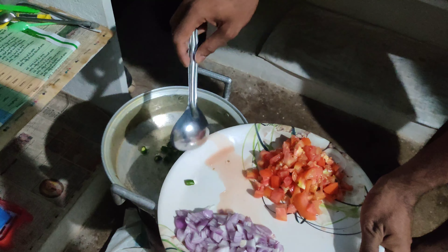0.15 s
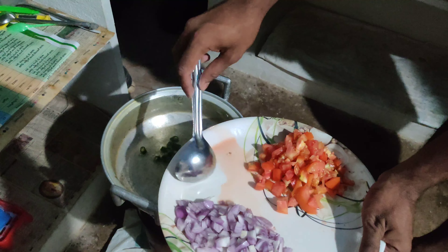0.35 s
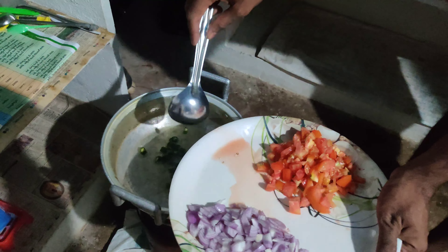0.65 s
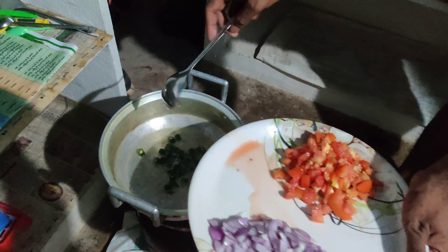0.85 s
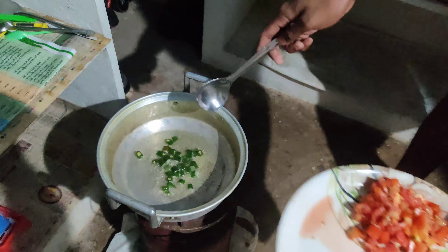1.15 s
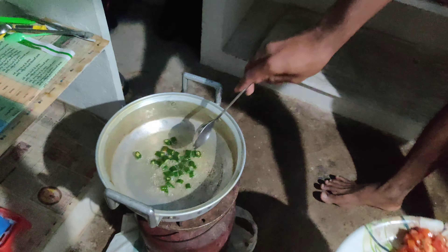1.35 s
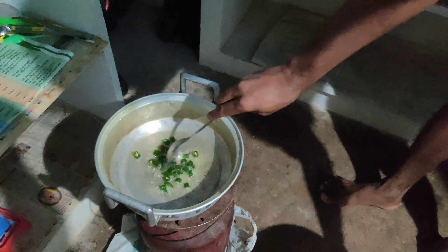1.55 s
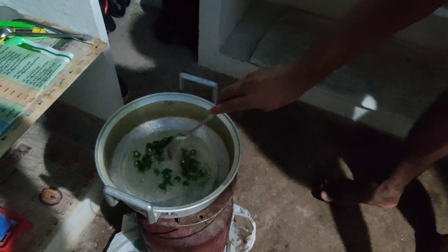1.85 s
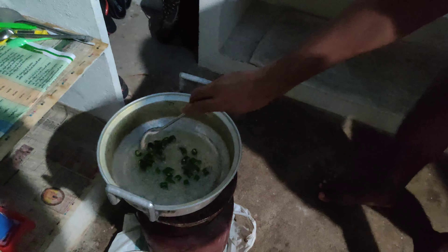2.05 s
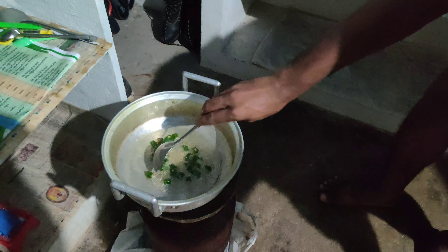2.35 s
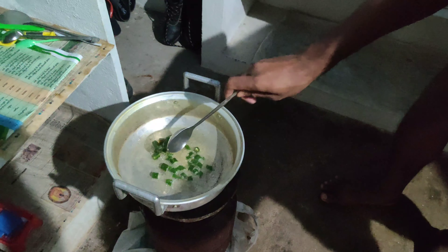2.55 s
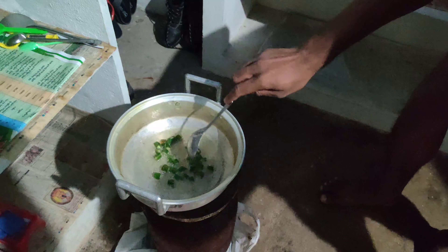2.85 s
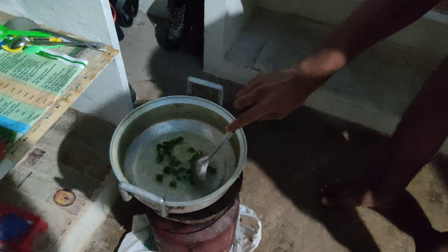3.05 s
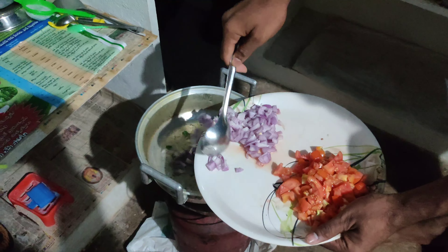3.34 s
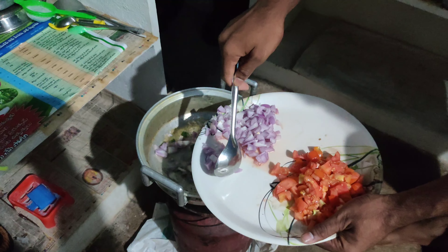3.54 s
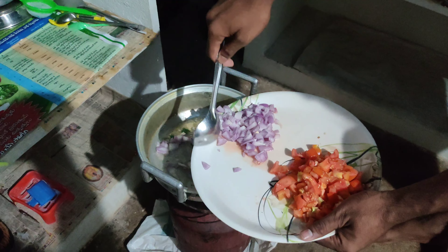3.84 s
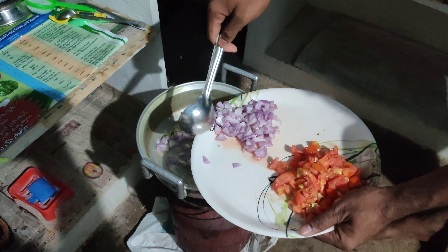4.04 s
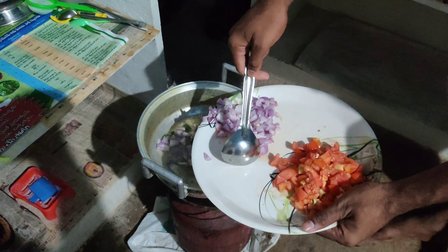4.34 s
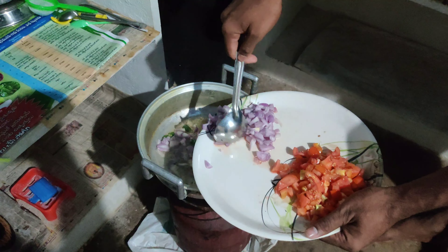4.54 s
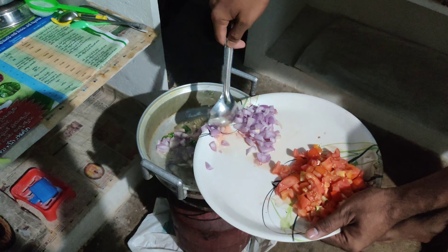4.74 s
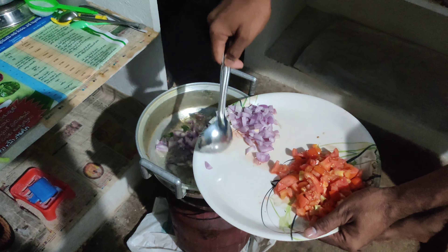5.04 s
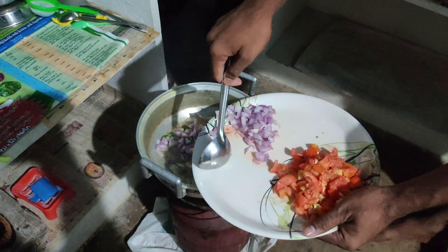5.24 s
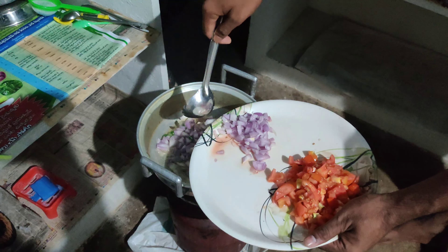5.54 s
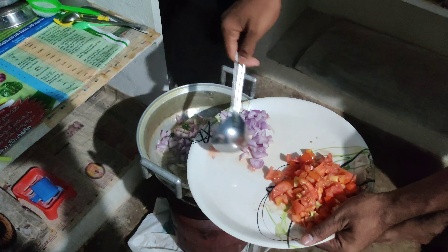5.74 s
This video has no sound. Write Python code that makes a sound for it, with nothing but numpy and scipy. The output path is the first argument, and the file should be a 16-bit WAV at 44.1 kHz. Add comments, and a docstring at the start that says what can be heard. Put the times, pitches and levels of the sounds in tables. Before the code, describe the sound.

Close stereo sound in a small home kitchen. From 0 to 3.2 s, chopped chillies fry in a metal pot: a dense, steady, grainy sizzle, strongest in the upper mids, with hollow pot resonance and brief dips. Small oily spits pop around 0.2-0.3, 1.2-1.6, 2.3-2.7 and 3.0 s. A steel spoon drags faintly, taps lightly near 0.45 s, clanks with a hollow ring at 1.83 s, rattles in a quick cluster at 2.7 s and knocks at 3.15 s with a scrape. At 3.2 s everything cuts out for under a tenth of a second, then fades in by 3.5 s as onion frying: quieter, finer, higher, flaring as pieces land and gradually drying down. Soft low plate bumps come near 3.45 and 4.4 s; spoon knocks at 3.7, 4.42 (clearest), 5.03, 5.26 and faintly 5.78 s. Low fluttering stove rumble and faint hum continue underneath, until the end at about 5.9 s.

```python
"""In a kitchen, close over a metal pot on a stove: green chillies fry in hot oil, stirred with a steel spoon.
Thousands of noisy bubble bursts, coloured by bubble size and the air in the pot, make the sizzle at two microphones.
Short swarms of noise splutter; damped sines make the spoon's knocks; its drags are noise through narrow resonances.
The sound drops out briefly and fades back in on chopped onion pushed off a plate: a finer, higher sizzle.
A low rumble and faint hum lie underneath; soft low bumps come from the plate."""
import sys
import numpy as np
from scipy import signal
from scipy.fft import rfft, irfft
from scipy.io import wavfile
from scipy.ndimage import uniform_filter1d

SR = 44100
rng = np.random.default_rng(int(sys.argv[2]) if len(sys.argv) > 2 else 0)


def to_wav(s):
    """Save 16-bit WAV."""
    ch = np.atleast_2d(s).T  # columns
    pcm = np.round(np.clip(ch, -1, 1) * 32767)  # PCM
    wavfile.write(sys.argv[1], SR, pcm.astype(np.int16))


N = 259749
TIME = np.arange(N) / SR

# All table levels are relative; the functions set the final balance.
# Chilli sizzle at the two microphones: pitch_hz, left_db, right_db
SIZZLE_SPECTRUM = [(385, -29.5, -29), (995, -15, -14), (1760, -11.5, -9.5), (2160, -5, -3.5),
                   (3220, -3.5, 1.1), (4580, -3.5, -1), (5470, -16, -2.5), (7100, -13.5, -3),
                   (8710, -19.5, -20), (10000, -19, -19), (13100, -20, -17.5), (15800, -18.0, -20.5)]
# Change of colour with wet onion: pitch_hz, change_db
ONION_COLOUR = [(500, 11.5), (1000, -2), (2300, -0.5), (4000, 4.5), (6500, 7), (9500, -6), (14000, -2)]
# Resonances of the air in the pot: pitch_hz, width_hz, lift_db
POT_AIR = [(446, 84, 14.5), (615, 49, 14.5), (746, 39, 10), (1200, 105, 7)]
# Lulls as the food is lifted or pushed out of the oil: middle_s, half_length_s, depth_db, tiny_bubble_loss_db
LULLS = [(0.36, 0.071, 2, 3.5), (0.62, 0.047, 2, 1), (1.055, 0.16, 2, 0), (1.40, 0.064, 0.5, 2.5),
         (1.703, 0.032, 7.5, -0.5), (1.765, 0.032, 4.5, 4), (2.22, 0.061, 2.5, -0.5),
         (2.514, 0.059, 0.7, 2.5), (2.774, 0.043, 2.5, 3.5), (4.688, .04, 3.5, 0), (5.14, 0.059, 0.5, 2.5)]
# Rumble of the stove and kitchen: pitch_hz, level_db (per Hz)
RUMBLE_SPECTRUM = [(25, 2.5), (42, -7.5), (64, -7.5), (82, -13), (98, -5), (130, -13), (172, 0.5),
                   (205, -0.5), (252, -5.5), (292, -11.5), (343, -5.5), (400, -20), (600, -3.5),
                   (1500, -34)]
# Rise and fall of the rumble and hum: time_s, level_db
RUMBLE_SWELL = [(0, 3), (.8, 2.5), (1.7, -1), (2.2, -1.5), (3.2, 1), (4.4, 2.5), (5.3, 3), (5.89, 3)]
# Strokes of the spoon that make the metal sing: start_s, end_s, level_db
DRAGS = [(0.023, 0.39, -33.5), (0.45, 0.544, -32), (0.687, 1.214, -37), (1.46, 1.683, -38.5),
         (1.883, 2.13, -41), (2.98, 3.095, -37.5), (3.132, 3.2, -18.5), (3.343, 3.60, -37.5),
         (5.08, 5.15, -31), (5.18, 5.239, -29), (5.28, 5.355, -37)]
# What sings under the dragging spoon: pitch_hz, half_width_hz, level_db
SINGING_METAL = [(610, 16, 8), (634, 75, -2), (1200, 28, -2)]
# Oil spluttering as the food shifts: start_s, level_db, centre_hz, decay_s
SPLUTTERS = [(0.217, -17, 3700, 0.012), (.236, -10, 3760, 0.011), (0.297, -10.5, 2680, 0.0054),
             (.320, -16, 2380, .006), (1.232, -12, 3500, 0.019), (1.335, -13, 2730, 0.017),
             (1.630, -13, 2920, 0.026), (2.320, -14, 3800, 0.0088), (2.557, -15, 4100, 0.014),
             (2.654, -12, 3980, 0.0069), (2.963, -16, 2550, 0.028), (3.044, -10, 2700, 0.011),
             (4.3805, -13.5, 7500, .003), (4.765, -19, 4800, 0.015), (5.031, -17, 4200, 0.014),
             (5.503, -22, 3900, 0.02), (5.678, -20.5, 3750, 0.023)]
# Ringing of the pot: pitch_hz, level_db, t60_s
POT_MODES = [(317.4, 0.5, 0.46), (476, -21, 0.26), (574, -10, 0.32), (618.6, 2.5, 0.18), (640, 0, 0.21),
             (678, -13.5, 0.35), (744, -7.5, 0.25), (808, -8.5, 0.47), (930, -9, 0.084), (1067, -8, 0.34),
             (1190, -42.5, 0.26), (1200, -8, 0.19), (1380, -10, 0.25), (2070, -19, .2), (2350, -19.5, .2)]
# Knocks of the spoon: start_s, ring_db, struck_place_hz, thud_db, scrape_db
KNOCKS = [(0.432, -18, 510, -13.5, -14.5), (.442, -19, 600, -22, -17), (.510, -26, 700, -18, -17),
          (1.834, -5.5, 634, -6, -16), (1.864, -23, 600, -24, -17), (2.694, -12, 730, -6, -34),
          (2.702, -28, 890, -29, -13), (2.711, -12, 1200, -7.5, -18), (2.711, -22.5, 344, -21, -37),
          (2.721, -11.5, 780, -6.5, -26), (3.146, -10.5, 640, -8, -16), (3.176, -39, 610, -10, -30),
          (3.702, -22, 1200, -17.5, -24), (4.4165, -14, 747, -7.5, -26), (4.427, -23, 1050, -8, -24),
          (5.026, -22, 840, -20, -18), (5.033, -36, 1200, -34, -20), (5.259, -19, 790, -19, -23.5),
          (5.780, -37, 1200, -33, -23.5)]
# Pieces of onion land and the sizzle flares: start_s, lift_db, time_to_top_s
FLARES = [(3.66, 0.9, .05), (3.79, 1.2, 0.097), (4.07, 1.2, 0.055), (4.36, 1.0, 0.055), (4.49, 0.5, 0.041),
          (4.88, 1.6, 0.013), (5.02, 1, .02), (5.24, 2.5, 0.038), (5.59, 0.6, 0.059), (5.80, 1.3, 0.048)]
# Soft bumps as the plate is handled: start_s, level_db, pitch_hz
BUMPS = [(3.446, -25, 69.4), (3.506, -36, 111), (4.359, -29, 90.5), (4.421, -32, 97)]

PAUSE_START_S, PAUSE_END_S = 3.204, 3.291
ONION_FROM_S = (PAUSE_START_S + PAUSE_END_S) / 2
FADE_DB, FADE_S = 17, 0.11  # depth and length of the fade after the pause
EDGE_HZ = 15950  # upper band limit

# Chillies: large and tiny bubbles are relative to the main 2.5-8 kHz sizzle
CHILLI_DB, HEATING_DB_PER_S, CHILLI_LARGE_DB, CHILLI_TINY_DB = -20.5, 0.12, -9.5, -11.5
# Onion: builds up until ONION_FULL_S, then sinks as it dries
ONION_DB, ONION_FULL_S, BUILD_DB_PER_S, DRYING_DB_PER_S = -26, 3.562, 44, 2.5
# Its large bubbles hold up while it dries; its tiny ones sink and flare somewhat more than the main sizzle
ONION_LARGE_DB, ONION_TINY_DB, LARGE_SHARE, TINY_EXTRA_SHARE = -12.5, -4, 0.94, 0.35


def amp(db):
    """Decibels to gain."""
    return 10 ** (np.asarray(db) / 20)


def evened(x):
    """Scales to rms 1."""
    return x / np.sqrt(np.mean(x ** 2) + 1e-20)


def read(points, hz, axis=1):
    """One column of a spectrum table, on a log-frequency axis."""
    table = np.transpose(points)
    return np.interp(np.log(hz + 1), np.log(table[0] + 1), table[axis])


def hump(hz, centre_hz, octaves):
    """A bell on the log-frequency axis."""
    return np.exp(-.5 * (np.log2((hz + 1) / centre_hz) / octaves) ** 2)


def coloured(x, gain):
    """Filters by a gain that is a function of frequency."""
    hz = np.fft.rfftfreq(x.shape[-1], 1 / SR)
    return irfft(rfft(x) * gain(hz), x.shape[-1])


def add(mix, start_s, sound):
    """Adds a stereo sound at a given time."""
    part = mix[:, round(start_s * SR):][:, :sound.shape[1]]
    part += sound[:, :part.shape[1]]


def two_ports(z, hz, merge_hz):
    """Long waves reach both microphones alike, short ones unrelated."""
    same = np.clip(1 / (1 + (hz / merge_hz) ** 3), 0, 1)
    right = same * z[0] + np.sqrt(1 - same ** 2) * z[1]
    return np.array([z[0], right])


def echoes(t60, wet_db, size=4000):
    """A direct click, a little later on the right, and its dying reflections."""
    tail = rng.standard_normal((2, size)) * amp(-60 * np.arange(size) / SR / t60)
    tail *= amp(wet_db) / np.linalg.norm(tail, axis=1, keepdims=True)
    tail[[0, 1], [0, rng.integers(6, 11)]] += 1
    return tail


def bubbles(per_s, spread_db, count=28):
    """Bursts of all sizes at many spots in the oil, each spot with its own echoes off the pot wall."""
    out = np.zeros((2, N))
    size = amp(spread_db * np.minimum(rng.exponential(1, N), 4.4)) * rng.choice([-1, 1], N)
    bursts = size * (rng.random(N) < per_s / SR)
    spot = rng.integers(0, count, N)
    for k in range(count):
        at_spot = (bursts * (spot == k))[None]
        out += signal.oaconvolve(at_spot, echoes(t60=0.044, wet_db=4.5), axes=1)[:, :N]
    return evened(out)


def chillies(t):
    """Level, large bubbles and tiny bubbles (dB) of a steady frying that slowly heats up."""
    level_db = CHILLI_DB + HEATING_DB_PER_S * t
    return np.array(np.broadcast_arrays(level_db, CHILLI_LARGE_DB, CHILLI_TINY_DB))


def frying(t):
    """Chillies before the pause, onion after it; lulls lower the sizzle and alter its tiny bubbles."""
    level_db, large_db, tiny_db = np.where(t < ONION_FROM_S, chillies(t), onions(t))
    for middle_s, half_s, depth_db, loss_db in LULLS:
        lull = np.exp(-((t - middle_s) / half_s) ** 2)
        level_db = level_db - depth_db * lull
        tiny_db = tiny_db - loss_db * lull
    return level_db, large_db, tiny_db


def sizzle(patchy_db=1.39, flicker_db=0.45, clump_db=1.2):
    """Bursting bubbles, coloured by their sizes and by the air in the pot."""
    hz, t, z = signal.stft(bubbles(per_s=9000, spread_db=2.0), SR, nperseg=1024, noverlap=768)
    f = hz[:, None]
    z = two_ports(z, f, merge_hz=700)
    colour_db = np.array([read(SIZZLE_SPECTRUM, f, axis=1), read(SIZZLE_SPECTRUM, f, axis=2)])
    colour_db = colour_db + (t > ONION_FROM_S) * read(ONION_COLOUR, f)
    for centre_hz, width_hz, lift_db in POT_AIR:
        colour_db += lift_db / (1 + (2 * (f - centre_hz) / width_hz) ** 2)
    colour_db -= 10 * np.log10(1 + (330 / (f + 1)) ** 4)  # small bubbles give no bass

    def power_db(lo_hz, hi_hz):
        """Level of the colour in one band."""
        power = (amp(colour_db) ** 2).mean(0)
        return 10 * np.log10(power[(hz > lo_hz) & (hz < hi_hz)].sum(0) / len(hz) / 2)

    colour_db -= power_db(2500, 8000)  # the main band becomes the 0 dB reference
    level_db, large_db, tiny_db = frying(t)
    # large bubbles come in clumps
    clumps = evened(uniform_filter1d(rng.standard_normal(len(t)), size=10))
    large_db = large_db + clump_db * clumps
    # large bubbles fill the middle of the spectrum, tiny ones its top
    more_large_db = large_db - power_db(1300, 2500)
    more_tiny_db = tiny_db - power_db(8500, 15500)
    colour_db += 1.51 * more_large_db * hump(f, 1225, 0.72)
    colour_db += more_tiny_db * np.clip((f - 6500) / 2500, 0, 1)
    # clusters of like bubbles come and go, and the whole flickers
    patches = uniform_filter1d(rng.standard_normal(colour_db.shape[1:]), 7, axis=1)
    patches = evened(uniform_filter1d(patches, 20, axis=0))
    flicker = evened(uniform_filter1d(rng.standard_normal(len(t)), size=7))
    colour_db += patchy_db * patches + flicker_db * flicker
    return signal.istft(z * amp(colour_db + level_db), SR, nperseg=1024, noverlap=768)[1][:, :N]


def stove(rumble_db=-40, hum_hz=97, hum_db=-57, draught_db=0, flutter_db=2.0):
    """Low, fluttering rumble under the pot with a faint hum; the deepest draught differs at each microphone."""
    hz = np.fft.rfftfreq(N, 1 / SR)
    shared = two_ports(rfft(rng.standard_normal((2, N))), hz, merge_hz=600)
    draught = rfft(rng.standard_normal((2, N))) / (1 + (hz / 85) ** 4) * amp(draught_db)
    rumble = evened(irfft((shared + draught) * amp(read(RUMBLE_SPECTRUM, hz)), N))
    hum = np.sqrt(2) * np.sin(2 * np.pi * hum_hz * TIME)
    flutter = evened(coloured(rng.standard_normal(N), lambda f: hump(f, 6.3, 1.0)))
    swell_db = np.interp(TIME, *np.transpose(RUMBLE_SWELL)) + flutter_db * flutter
    return (amp(rumble_db) * rumble + amp(hum_db) * hum) * amp(swell_db)


def drags(level_db=-2, merge_hz=700):
    """Friction of the spoon feeds a few narrow resonances of the metal."""
    press = np.zeros(N)
    for start_s, end_s, db in DRAGS:
        press += amp(db) * np.clip(np.minimum(TIME - start_s, end_s - TIME) / 0.025, 0, 1)
    f = np.fft.rfftfreq(N, 1 / SR)
    friction = two_ports(rfft(rng.standard_normal((2, N))), f, merge_hz)
    metal = sum(amp(db) / (1 + ((f - hz) / half_width_hz) ** 2) for hz, half_width_hz, db in SINGING_METAL)
    return amp(level_db) * press * evened(irfft(friction * metal, N))


def splutters(level_db=-5.5, left_db=-4):
    """A pocket of water boils off at once: a quick swarm of like bubbles."""
    out = np.zeros((2, N))
    for start_s, db, centre_hz, decay_s in SPLUTTERS:
        u = np.arange(6000) / SR / decay_s
        swarm = evened(coloured(rng.standard_normal((2, len(u))), lambda f: hump(f, centre_hz, 0.18)))
        envelope = 2 * (1 - np.exp(-6 * u)) * np.exp(-u)
        add(out, start_s, amp(db + level_db) * swarm * envelope)
    return out * amp([[left_db], [0]])


def spoon(ring_db=-1, contact_db=-1, tick_db=3, contact_s=0.011, thud_cycles=1.94,
          overtone=1.77, overtone_db=-8, room_db=-8):
    """Each knock dents the metal for a few cycles, rings the modes near the place struck, ticks and scrapes."""
    out, t = np.zeros((2, N)), np.arange(SR // 2) / SR
    hz, mode_db, t60 = np.transpose(POT_MODES)[:, :, None]
    for start_s, db, place_hz, thud_db, scrape_db in KNOCKS:
        # higher modes always ring a little
        weight = amp(mode_db) * (hump(hz, place_hz, 0.41) + .12 * (hz > place_hz))
        # each microphone hears the modes in different phase
        phase = rng.uniform(0, 2 * np.pi, hz.shape) + rng.normal(0, 0.68, (2, len(hz), 1))
        modes = weight * amp(-60 * t / t60) * np.sin(2 * np.pi * hz * t + phase)
        ring = modes.sum(1) / np.linalg.norm(weight)
        cycles = place_hz * t
        ring *= 1 - np.exp(-cycles / thud_cycles)  # the ring grows as the thud spreads through the metal
        dent = np.sin(2 * np.pi * cycles) + amp(overtone_db) * np.sin(2 * np.pi * overtone * cycles)
        thud = -dent * np.exp(-cycles / thud_cycles) * (1 - np.exp(-cycles / 0.34))
        contact = np.exp(-t / contact_s) + amp(tick_db) * np.exp(-t / 0.00016)  # scrape plus sharp tick
        scrape = evened(coloured(rng.standard_normal((2, len(t))), lambda f: hump(f, 2060, 1.0))) * contact
        knock = amp(db + ring_db) * ring / 2 + amp(thud_db) * thud + amp(scrape_db + contact_db) * scrape
        add(out, start_s, knock)
    kitchen = signal.oaconvolve(out, echoes(t60=0.38, wet_db=room_db, size=12000), axes=1)[:, :N]
    return kitchen * amp([[-1], [1]])  # a little louder on the right


def onions(t):
    """Level, large and tiny bubbles (dB) of wet onion: it builds up, dries off, and flares with each new piece."""
    build_db = -BUILD_DB_PER_S * np.clip(ONION_FULL_S - t, 0, ONION_FULL_S - PAUSE_END_S - FADE_S)
    dried_db = DRYING_DB_PER_S * np.maximum(t - ONION_FULL_S, 0)
    change_db = build_db - dried_db
    for start_s, lift_db, rise_s in FLARES:
        u = np.maximum(t - start_s, 0) / rise_s
        change_db = change_db + lift_db * u * np.exp(1 - u)
    large_db = ONION_LARGE_DB + LARGE_SHARE * dried_db
    tiny_db = ONION_TINY_DB + build_db + TINY_EXTRA_SHARE * change_db
    return np.array([ONION_DB + change_db, large_db, tiny_db])


def bumps(decay_s=0.022):
    """Dull, low pushes of the plate: quickly damped sines with no ring."""
    out, t = np.zeros((2, N)), np.arange(SR // 4) / SR
    for start_s, db, hz in BUMPS:
        push = np.sin(2 * np.pi * hz * t) * (1 - np.exp(-hz * t)) * np.exp(-t / decay_s)
        add(out, start_s, amp(db) * push[None])
    return out


def scene():
    """Frying, stove, spoon and plate together."""
    return sizzle() + stove() + drags() + splutters() + spoon() + bumps()


def record(dry, settle_db=-8, settle_hz=2.08, settle_s=0.32):
    """A brief dropout and fade-in, a subsonic swing as the microphone settles, a soft ceiling and the band limit."""
    fade = amp(-FADE_DB * np.clip(1 - (TIME - PAUSE_END_S) / FADE_S, 0, 1))
    live = uniform_filter1d((TIME < PAUSE_START_S) + (TIME > PAUSE_END_S) * fade, size=60)
    t = np.maximum(TIME - 3.375, 0)
    swing = amp(settle_db) * np.sin(2 * np.pi * settle_hz * t) * np.exp(-t / settle_s)
    sound = dry * np.maximum(live, amp(-56)) + swing
    sound = sound / (1 + (sound / .88) ** 8) ** (1 / 8)  # soft ceiling
    band_limit = signal.firwin(401, EDGE_HZ, window=("kaiser", 9), fs=SR)
    return signal.oaconvolve(sound, band_limit[None], "same")


dry = scene()
out = record(dry)
to_wav(out)
```